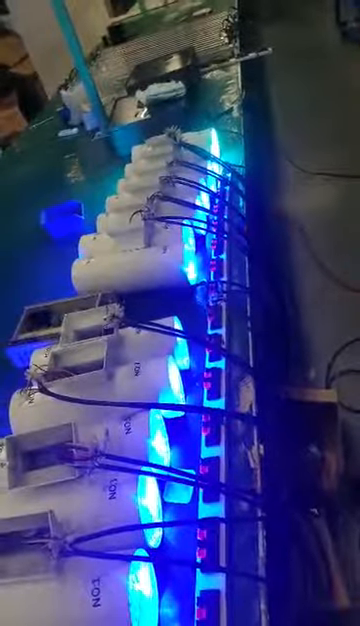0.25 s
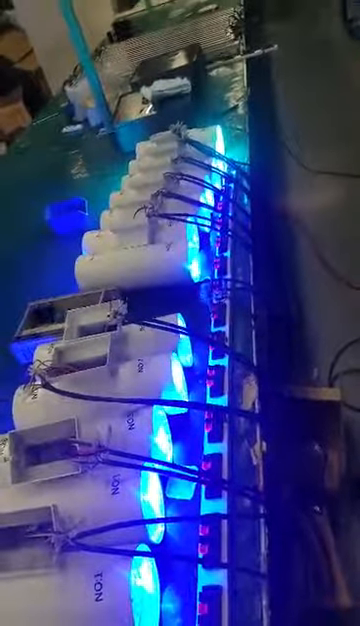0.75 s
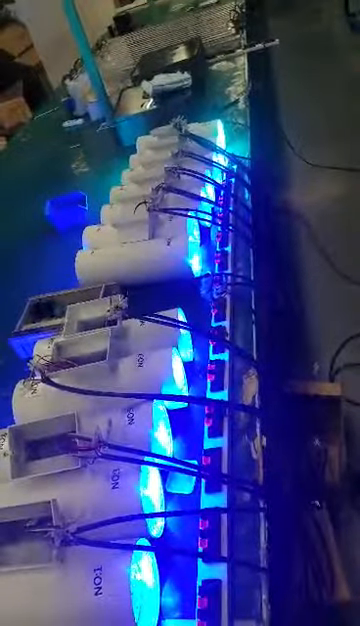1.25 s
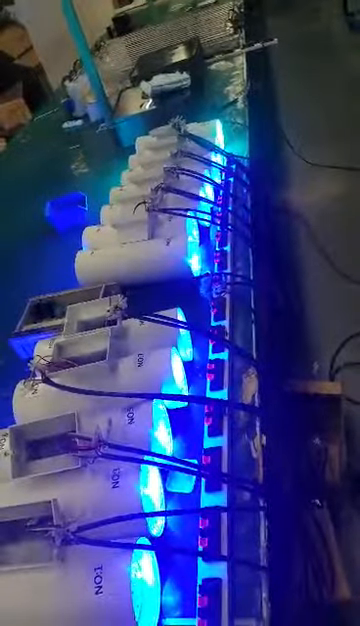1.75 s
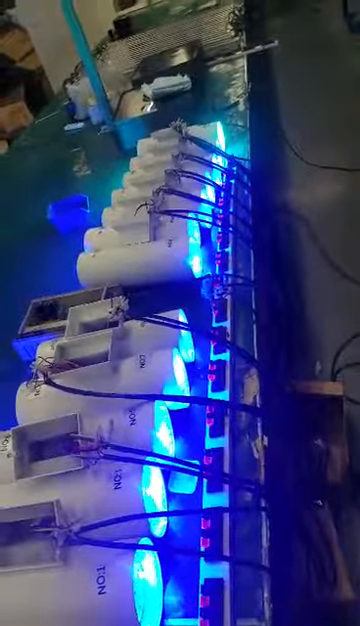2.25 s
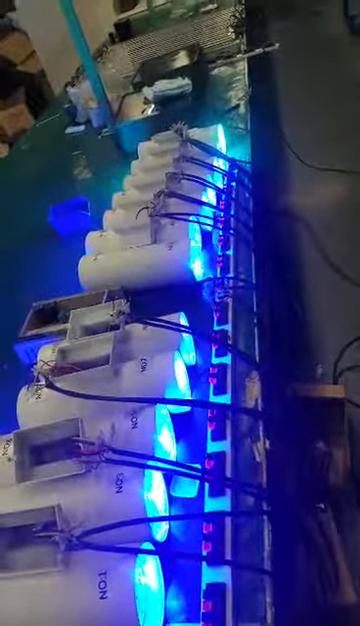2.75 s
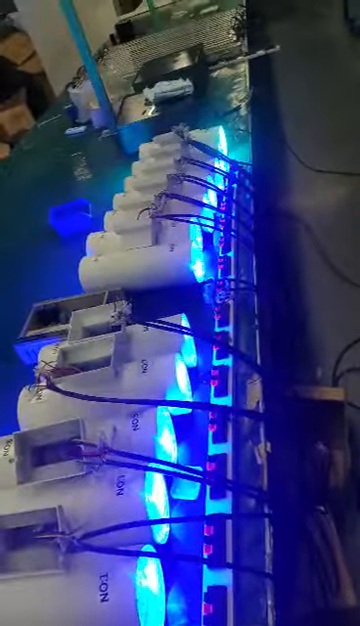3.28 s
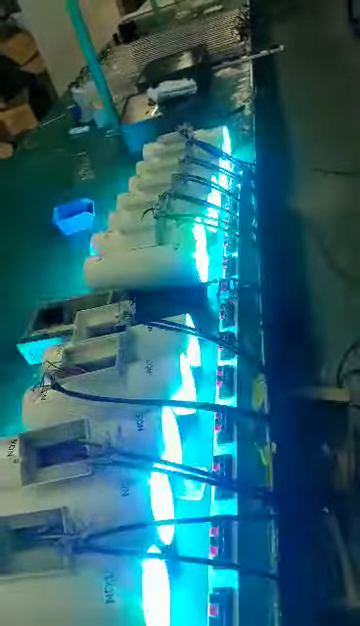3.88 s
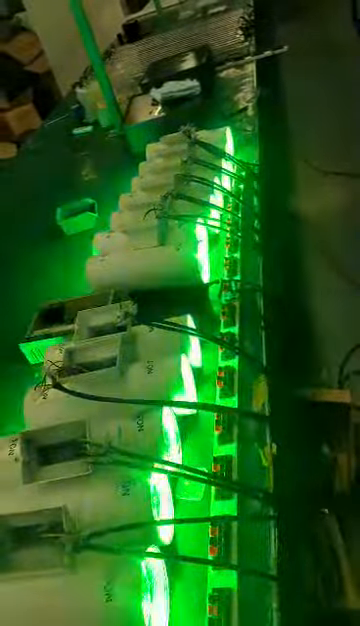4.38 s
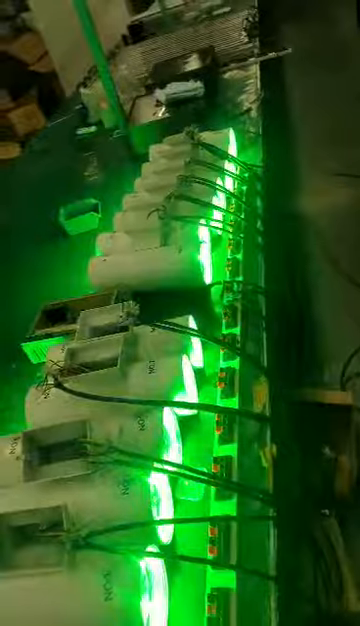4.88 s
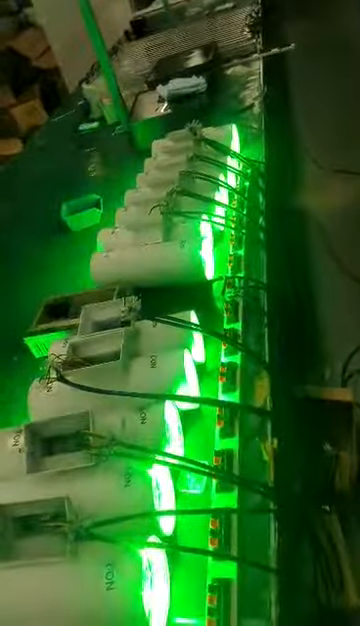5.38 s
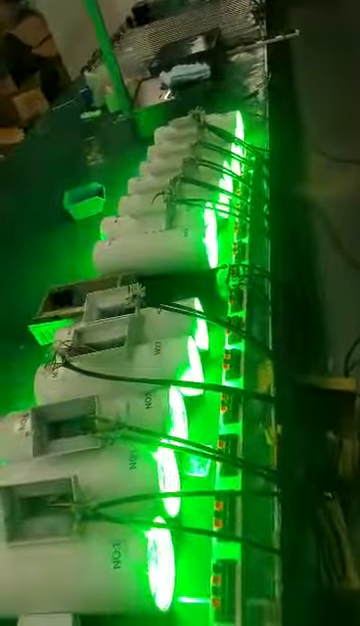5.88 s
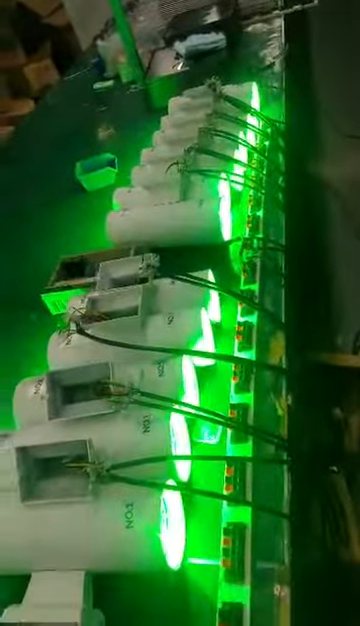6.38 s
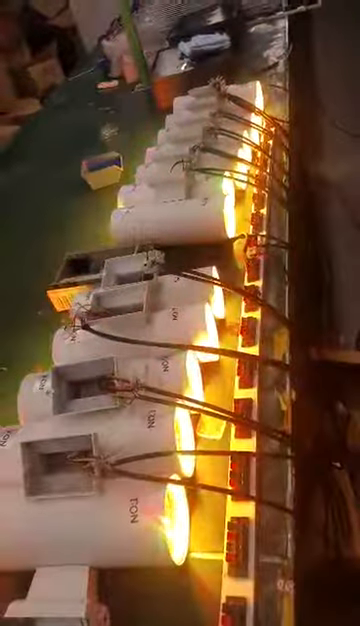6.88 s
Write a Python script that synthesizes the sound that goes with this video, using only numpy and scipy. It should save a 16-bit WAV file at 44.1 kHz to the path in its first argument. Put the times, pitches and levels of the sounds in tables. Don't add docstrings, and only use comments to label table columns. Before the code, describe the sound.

A constant electronic-sounding fan tone dominates, thin and nearly unwavering, with weaker tones above and below and gentle airflow hiss. Six small plastic clicks come sparsely from the right, presses sharper than releases. Soft distant footsteps nudge the low room rumble, mostly around the middle. The close hand-held phone turns late, subtly shifting the whine's stereo balance toward the left.

```python
import sys
import numpy as np
from scipy import signal
from scipy.fft import rfft, irfft, next_fast_len
from scipy.io import wavfile
from scipy.ndimage import uniform_filter1d, map_coordinates

SR = 44100
rng = np.random.default_rng(int(sys.argv[2]) if len(sys.argv) > 2 else 0)


def decibels_to_gain(level_db):
    exponent = np.asarray(level_db, float) / 20
    return 10 ** exponent


def generate_wav(sig):
    pcm = np.round(np.clip(np.atleast_2d(sig).T, -1, 1) * 32767).astype(np.int16)
    wavfile.write(sys.argv[1], SR, pcm)


N = 314874

# f/Hz, left level/dB per Hz, right level/dB per Hz
ROOM = [(22.3, -87, -85), (79.3, -75.5, -75), (107, -81, -80.5), (142, -81, -79.5), (216, -86.5, -85.5),
        (285, -84.5, -84.5), (290, -83.5, -84.5), (330, -85.5, -83.5)]
# t/s, peak level/dB, f/Hz
FOOTFALLS = [(.9, -45.5, 45), (2.66, -51, 45), (3.145, -44, 74), (3.36, -48, 49.6), (3.565, -45, 75),
             (3.66, -51, 114.6), (4.04, -45, 70.8), (4.345, -47, 86), (4.53, -45, 84), (4.93, -52, 90),
             (6.3, -52, 60)]
RUMBLE_TOP_HZ = 125
STILL_DB = -60


def seconds():
    return np.arange(N) / SR


def curve(rows):
    return np.interp(seconds(), *np.transpose(rows))


def wobble(rate):
    return map_coordinates(rng.standard_normal(int(N * rate / SR) + 4), [np.arange(N) * rate / SR])


def turned():
    # t/s, share of the turn
    moves = [
        (5.6, 0),
        (6.1, 0.43),
        (6.6, 0.59),
        (7.14, 1.2),
    ]
    return curve(moves)


def fan_tones():
    # shaft order, left level/dB, right level/dB,
    # left lead/rad, left change/dB and right change/dB when turned
    tones = [(4, -72, -76, .9, -3, 2), (9, -39.8, -41.4, -.35, 1.6, -2.8), (16, -69, -67.5, 1.9, -2, 3),
             (18, -57, -57, 2.9, -4, 3.5), (20, -65.5, -65, -2.2, 2.5, -8), (24, -78, -72.5, .5, 2, -3),
             (27, -58, -62.5, 1, -1, 0), (36, -68, -73, 1.4, -11, 0), (45, -86, -75, -1.6, 10, -5),
             (54, -88, -83, 3, 1, 5), (63, -97, -88, .8, 2, -10)]
    lead_swings = [1, .2, .3, -.9, .1, -.5, -.3, 1.2, 1.5, .3, 1.5]
    flutters = [2.1, .3, 2.1, 1.2, 2, 2.1, .7, .6, 1.3, 1.8, 1.8]
    # t/s, level/dB
    effort = [(0.0, -44), (0.02, -43.5), (0.44, -44.5), (1.05, -43), (1.33, -45), (2.05, -44.5),
              (6.82, -44.5), (7.12, -43.5), (7.14, -45)]
    shaft_hz, hunt_hz, recede_hz = 95.062, .035, .07
    turn = turned()
    angle = 2 * np.pi * np.cumsum(shaft_hz + hunt_hz * wobble(2.5) - recede_hz * turn) / SR
    out = np.zeros((2, N))
    for tone, lead_swing, flutter_db in zip(tones, lead_swings, flutters):
        order, left_db, right_db, lead, left_change_db, right_change_db = tone
        phase = round(order) * angle + rng.uniform(0, 2 * np.pi) + .04 * flutter_db * wobble(3.6)
        shared_db = flutter_db * wobble(5)
        left_db = left_db + left_change_db * turn + shared_db
        right_db = right_db + right_change_db * turn + shared_db + 0.87 * flutter_db * wobble(4.37)
        out[0] += decibels_to_gain(left_db) * np.sin(phase + lead + lead_swing * turn)
        out[1] += decibels_to_gain(right_db) * np.sin(phase)
    effort_db = curve(effort)
    swell_db = .08 * wobble(1.6)
    return np.sqrt(2) * decibels_to_gain(effort_db - effort_db.mean() + swell_db) * out


def along(rows, hz):
    f, *cols = np.transpose(rows)
    return np.array([np.interp(np.log(hz + 1), np.log(f + 1), c) for c in cols])


def rush(rows, lo_hz, hi_hz, patchy_db):
    # f/Hz, likeness/0-1, left lead/rad
    likeness = [(40, 0.99, 0.1), (130, 0.92, 0.1), (250, 0.78, 0.1), (400, 0.54, 0.4), (600, 0.46, 0.3),
                (850, 0.72, -0.4), (1100, 0.43, 1.9), (1400, 0.65, 0.6), (1750, 0.03, 0.8),
                (2100, 0.4, 0.4), (2600, 0.56, 0.1), (3300, 0.27, 0.6), (4500, 0.29, 1.0),
                (7000, 0.18, 4.0)]
    z = signal.stft(rng.standard_normal((2, N + 8192)), nperseg=512)[2]
    field = uniform_filter1d(rng.standard_normal(z.shape[1:]), size=5, axis=0)
    field = uniform_filter1d(field, size=10, axis=1)
    pair = signal.istft(z * decibels_to_gain(patchy_db * field / field.std()), nperseg=512)[1]
    m = next_fast_len(pair.shape[1])
    hz = np.fft.rfftfreq(m, 1 / SR)
    a, b = rfft(pair / pair.std(), m)
    alike, lead = along(likeness, hz)
    mixing = np.arccos(np.clip(alike * (hz < 2 * likeness[-1][0]), 0, 1)) / 2
    left = (np.cos(mixing) * a + np.sin(mixing) * b) * np.exp(1j * lead)
    right = np.cos(mixing) * a - np.sin(mixing) * b
    gain = decibels_to_gain(along(rows, hz)) * np.sqrt(SR / 2) * (hz >= lo_hz) * (hz < hi_hz)
    places = [[[0] * len(hz), [1] * len(hz)], [hz / 28] * 2]
    ripple = map_coordinates(rng.standard_normal((2, 900)), places)
    gain *= decibels_to_gain(1.7 * ripple * np.clip(hz / 900, 0, 1))
    return irfft(gain * [left, right], m)[:, :N]


def shake_db():
    shake_re_step_db, rise_s, calm_s = -12.5, .05, 0.26
    power = 1
    for s, db, _ in FOOTFALLS:
        t = seconds() - s
        envelope = np.exp(-np.abs(t) / np.where(t < 0, rise_s, calm_s))
        power = power + decibels_to_gain(db + shake_re_step_db - STILL_DB) ** 2 * envelope
    return 10 * np.log10(power)


def hum_db():
    return 0.06 + 0.43 * shake_db() - 0.36 * seconds()


def air():
    # f/Hz, left level/dB per Hz, right level/dB per Hz
    flow_rows = [(322, -92, -85.5), (720, -81.5, -87.5), (856, -80.5, -75.5), (992, -84.5, -79.5),
                 (1225, -83.5, -84.5), (1300, -81, -80.5), (1804, -90, -87.5), (1938, -83.5, -79.5),
                 (2120, -87.5, -88), (2490, -87, -92.5), (2486, -80, -85.5), (2846, -99.5, -92.5)]
    # f/Hz, left level/dB per Hz, right level/dB per Hz
    hiss_rows = [(2880, -90.5, -94), (4200, -100, -95), (4480, -101, -93), (5300, -102, -100),
                 (6580, -108, -105), (8560, -109, -108), (8300, -113, -113), (9200, -114, -115),
                 (12500, -110, -110), (13500, -108, -110), (15600, -110, -111)]
    hum_top_hz, flow_top_hz = ROOM[-1][0], flow_rows[-1][0]
    hum = rush(ROOM, RUMBLE_TOP_HZ, hum_top_hz, patchy_db=-0.36)
    flow = rush(flow_rows, hum_top_hz, flow_top_hz, patchy_db=0.09)
    hiss = rush(hiss_rows, flow_top_hz, 15720, patchy_db=.4)
    flow_swell_db = .3 * wobble(2.2)
    shade_db = turned() * [[.3], [-1.6]]
    return hum * decibels_to_gain(hum_db()) + flow * decibels_to_gain(flow_swell_db) + hiss * decibels_to_gain(shade_db)


def rumble():
    # f/Hz, width/Hz, level/dB
    modes = [(45, 9, -65.5), (81.5, 7, -66.5), (117.8, 5.5, -71), (142.9, 5, -68), (188.2, 6, -71.5),
             (294, 6, -73.5), (1252, 5, -70), (1340, 8, -70.5), (1400, 12, -71), (1665, 4, -77)]
    t = seconds()
    shudder = rush([(8, -110, -110), *ROOM], 0, RUMBLE_TOP_HZ, patchy_db=0.3)
    out = decibels_to_gain(STILL_DB + shake_db()) * shudder / shudder.std()
    for s, db, hz in FOOTFALLS:
        thud = np.exp(-.5 * ((t - s) / 0.013) ** 2)
        out += decibels_to_gain(db) * thud * np.sin(2 * np.pi * hz * t)
    swell_db = 2.1 * hum_db()
    for hz, width_hz, db in modes:
        swing = wobble(width_hz) + 1j * wobble(width_hz)
        mode_db = db + swell_db * (hz < 2 * RUMBLE_TOP_HZ)
        out += decibels_to_gain(mode_db) * np.real(swing * np.exp(2j * np.pi * hz * t))
    return out


def key_crack(t):
    t60_s = .012
    noise = signal.lfilter([1, -.65], 1, rng.standard_normal((2, len(t))))
    noise = signal.lfilter(*signal.iirnotch(9700, 4, SR), noise)
    noise = signal.sosfilt(signal.butter(12, 15000, fs=SR, output="sos"), noise)
    return noise * decibels_to_gain(-60 * t / t60_s + [[-13], [0]])


def plastic_snap(t):
    # f/Hz, level/dB, t60/s, left re right/dB, left lead/rad
    snap_modes = [(1640, -4, .022, -2, 1.4), (1990, 5.5, .024, -6, .4), (2430, 3, .018, -3, 0),
                  (2750, -8, .012, -5, -.8), (4750, -6, .012, -9, 2)]
    out = np.zeros((2, len(t)))
    for hz, db, t60, pan_db, lead in snap_modes:
        ring = np.sin(2 * np.pi * (hz * t + 0.43 * rng.random()) + [[lead], [0]])
        out += decibels_to_gain(db + rng.normal(0, 0.71) - 60 * t / t60 + [[pan_db], [0]]) * ring
    return out


def console_body(t):
    # f/Hz, level/dB, t60/s, left re right/dB, rise/s
    body_modes = [(178, 0, .11, -2, .006), (530, 1, .08, -2, .003), (690, -5, .05, -3, .004),
                  (1040, 22, .026, -8, .0058)]
    body_leads = [-.2, -1.3, -1.3, 2.7]
    out = np.zeros((2, len(t)))
    for (hz, db, t60, pan_db, rise), lead in zip(body_modes, body_leads):
        ring = np.sin(2 * np.pi * hz * t + [[lead], [0]]) * np.clip(t / rise, 0, 1) ** 2
        out += decibels_to_gain(db + rng.normal(0, 1) - 60 * t / t60 + [[pan_db], [0]]) * ring
    return out


def keys():
    # t/s, snap level/dB
    strokes = [
        (0.6284, -45.5),
        (1.1033, -51),
        (3.118, -46),
        (4.6128, -56),
        (5.9401, -47),
        (6.951, -55),
    ]
    # delay/s, level/dB
    surfaces = [(.0043, -13), (.0085, -13), (.012, -11), (.019, -15)]
    blow_db = -48
    delay_s, contact_s = .0008, .0002
    out, t = np.zeros((2, N + SR)), np.arange(SR // 5) / SR
    for s, snap_db in strokes:
        body_db = blow_db - snap_db
        crack = decibels_to_gain(-.3 * body_db + 1.5) * key_crack(t)
        snap = decibels_to_gain(-.9 * body_db) * plastic_snap(t)
        body = decibels_to_gain(body_db + 2) * console_body(t)
        hit = np.clip(t / contact_s, 0, 1) * (crack + snap) + body
        start = round((s + delay_s) * SR)
        out[:, start:start + len(t)] += decibels_to_gain(snap_db + 5.0) * hit
    walls = sum(decibels_to_gain(db) * np.roll(out[::-1], round(s * SR), axis=1) for s, db in surfaces)
    walls = signal.lfilter(*signal.butter(2, 4500, fs=SR), walls)
    return (out + walls)[:, :N]


def scene():
    return fan_tones() + air() + rumble() + keys()


def roll_off(x):
    return signal.sosfilt(signal.butter(12, 16460, fs=SR, output="sos"), x)


def record(dry):
    mix = dry - .0006
    return roll_off(mix)


dry = scene()
out = record(dry)
generate_wav(out)
```